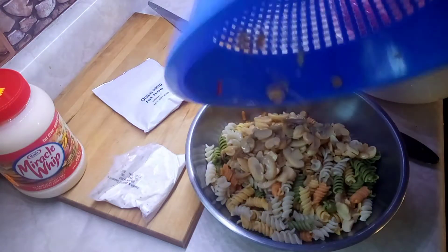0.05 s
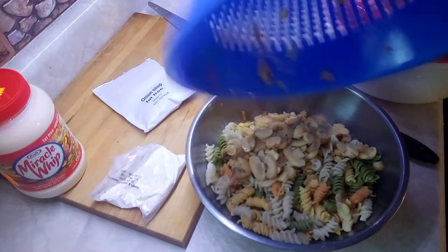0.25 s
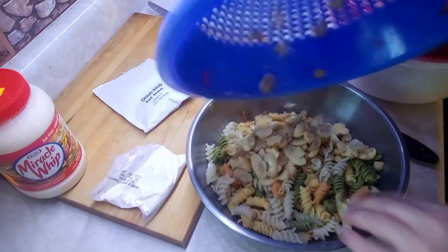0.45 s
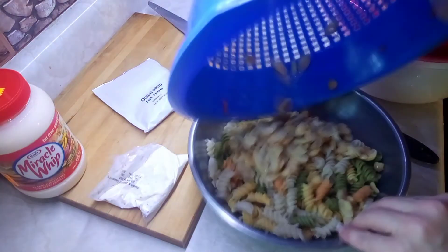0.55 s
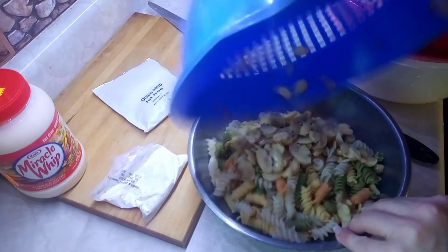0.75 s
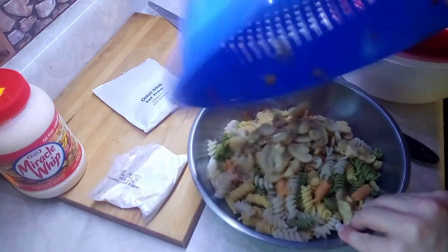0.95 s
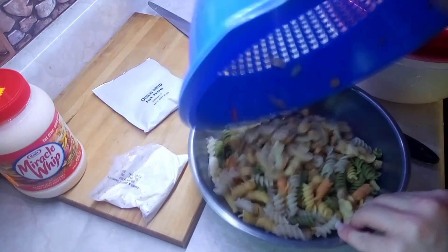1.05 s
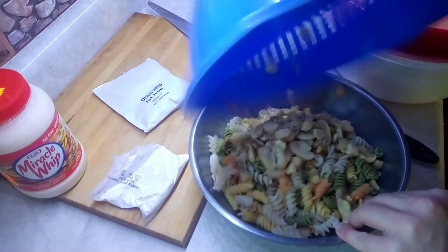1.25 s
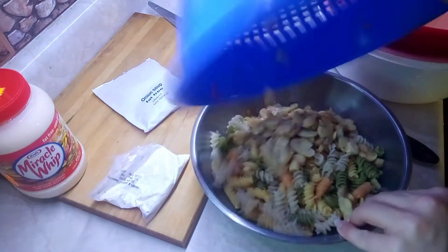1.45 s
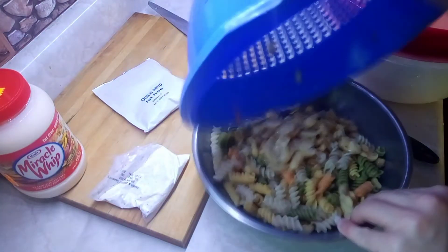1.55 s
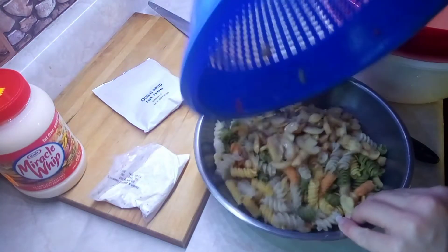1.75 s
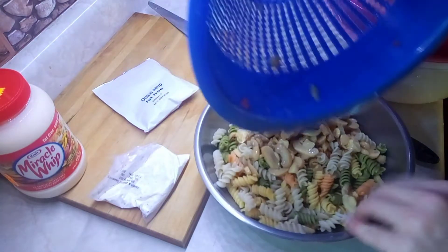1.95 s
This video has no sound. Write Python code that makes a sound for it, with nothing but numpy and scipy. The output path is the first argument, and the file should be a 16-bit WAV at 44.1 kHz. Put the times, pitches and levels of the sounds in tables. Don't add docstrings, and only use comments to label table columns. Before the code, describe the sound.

Plastic strainer knocking quickly against a metal mixing bowl, ringing at first, then damped and clattery.

```python
import sys
import numpy as np
from scipy import signal
from scipy.fft import rfft, irfft
from scipy.io import wavfile

SR = 44100
rng = np.random.default_rng(int(sys.argv[2]) if len(sys.argv) > 2 else 0)


def wav_out(sig):
    wavfile.write(sys.argv[1], SR, np.round(np.clip(np.atleast_2d(sig).T, -1, 1) * 32767).astype(np.int16))


def to_linear_factor(level_db):
    exponent = np.asarray(level_db, float) / 20
    return 10 ** exponent


N = 88288
LEAD = SR // 2

# start in seconds, peak in dB, then crack, boom and steel ping in dB.
KNOCKS = [
    (0.2724, -21.5, 0, 0.5, 4.5),
    (0.4454, -17, 0.5, -1, 6),
    (.625, -13.5, 1, -1.5, 3.5),
    (0.8005, -13.5, .4, -1.5, 2.8),
    (0.9652, -13.5, 1, -2.5, -4),
    (1.1278, -13.5, 1.5, -2.2, -1),
    (1.2801, -16.5, 7, 5.5, -7),
    (1.4613, -12, 3.5, -0.5, -12),
    (1.6213, -11.5, 0.5, -1.5, -6),
    (1.7866, -14, 3.5, 0.5, -6.5),
]
# start in seconds, peak in dB.
TOUCHES = [
    (1.293, -21),
    (1.2995, -21),
    (1.328, -29),
    (1.52, -36),
    (1.63, -21),
    (1.794, -23),
    (1.817, -38),
]
# frequency in Hz, level in dB, 60 dB decay in seconds.
SHELL_MODES = [(1088, -6.5, 0.037), (1377, -9, 0.098), (1676, -5, .04), (1819, -16.5, 0.15),
               (1973, -5.5, 0.029), (2580, -9.5, 0.054), (3840, -23.5, 0.07), (4097, -6.5, 0.025),
               (4230, 5, 0.016), (5080, -14.5, 0.013), (6900, -6, 0.076)]
# frequency in Hz, level in dB, 60 dB decay in seconds.
STEEL_MODES = [(2261, -9, 0.062), (3128, -4.5, 0.065), (3925, -2, 0.029), (4836, -3, 0.036),
               (5615, -16, 0.08)]
# frequency in Hz, level in dB, 60 dB decay in seconds.
BOOM_MODES = [(99.3, -8, 0.26), (159, -5, 0.19), (223, -9, 0.27), (339.9, -1, 0.26), (508, -9, 0.13),
              (762.4, 1, 0.083), (899, -4, 0.12)]
# frequency in Hz, level in dB per Hz.
CRACK_SPECTRUM = [(300, -34.5), (600, 2), (2500, -4), (4000, -1.5), (6000, -10.5), (7000, -12.5),
                  (9000, -26)]
# start in seconds, peak in dB, tick in dB.
THUDS = [
    (0.3099, -24.5, -49.5),
    (0.4961, -18.5, -43.5),
    (0.7114, -29.5, -58.5),
    (0.8466, -15, -40),
    (1.0126, -17, -48),
    (1.1746, -17, -42.5),
    (1.3359, -15.5, -34),
    (1.526, -27.5, -50),
    (1.678, -16, -38.5),
    (1.8552, -13.5, -38.5),
]
# delay in seconds, level in dB.
ECHOES = [
    (.0048, -8),
    (.0075, -6),
    (.0098, -2.5),
]
# frequency in Hz, level in dB, 60 dB decay in seconds.
BOARD_MODES = [(148.5, -7, 0.4), (208, -11.5, 0.13), (284, -6.5, 0.26), (325.2, 0, 0.26),
               (346.6, -7.5, 0.23), (425.7, -5.5, 0.23), (548.6, -3.5, 0.27), (620, -24, 0.048),
               (708, -2, .1), (914, 2, 0.082), (1120, -13.5, 0.16)]
# frequency in Hz, then level in dB in each of the four ringing spells.
BOWL_MODES = [(727, -89, -90, -90, -92), (1297, -81, -90, -90, -92), (1748, -95, -74, -84, -92),
              (2108, -86, -72, -71, -86), (2336, -73, -69, -73, -71), (2525, -80, -79, -77, -86),
              (2606, -73, -67, -63, -82), (3020, -92, -79, -70, -86), (3558, -84, -81, -72, -84),
              (4167, -84, -85, -83, -88)]
# start in seconds, stop in seconds.
RINGING_SPELLS = [
    (-.2, .275),
    (.3, 0.44),
    (.47, .627),
    (.65, 0.79),
]
# frequency in Hz, level in dB per Hz.
SHUDDER_SPECTRUM = [(35, -59), (60, -24), (125, -2), (329, -5.5), (740, -20), (1280, -25), (2500, -30.5),
                    (3250, -47), (5500, -120)]
# frequency in Hz, 60 dB decay in seconds (negative: the band grows instead).
ROOM_T60 = [(100, 0.1), (400, 0.22), (1200, 0.31), (3000, 0.15), (6000, 0.32), (12000, -1.22)]
# frequency in Hz, level in dB.
ROOM_TONE = [(100, -8), (400, -10), (1200, -15.5), (3000, -4), (6000, -15.5), (12000, -23.5)]
# frequency in Hz, level in dB per Hz.
AIR_SPECTRUM = [(18, -37), (30, -11.5), (150, 3.5), (791, -20), (1290, -16), (1490, -11.5), (2320, -8),
                (4260, 2), (8000, -21), (10400, -57), (17600, -120)]
# frequency in Hz, level in dB per Hz.
FIZZ_SPECTRUM = [(4410, -19), (7500, 0.5), (8190, -13.5), (8830, -11.5), (13600, -20.5), (15000, -6.5),
                 (15900, -7.5)]
# time in seconds, level in dB added to the fizz.
GRIT = [(0, 15), (.3, -11), (.46, 0), (.63, -2.5), (.8, 1.5), (1.13, 3), (1.301, 8.5), (1.471, 1),
        (1.63, 8.5), (1.701, 12), (1.79, 0.5), (1.85, 11)]

CHATTER_S, SPREAD_DB = 0.00398, 1.5
CRACK_DB, CRACK_T60_S, TICK_T60_S = -9.5, 0.029, 0.018
BOOM_RISE_S = 0.015
MODES_KEEP = 0.67
EARLIER_S, EARLIER_DB = -.065, -13.5
SLAP_HZ, SLAP_T60_S, SLAP_DB = 658, 0.0041, 11.5
BOWL_T60_S, BOWL_SWELL_S, STILL_S = 2.8, 0.005, 0.0033
SHUDDER_DB, SHUDDER_T60_S = -15.5, 0.26
ROOM_GAP_S = 0.0033
AIR_DB = -61.5
OVERLOAD = 0.5
MIC_LOW_HZ, MIC_HIGH_HZ = 70, 9400
FIZZ_DB, FIZZ_POWER, FIZZ_SIDE_DB, FIZZ_FLOOR_DB = -19, 1.136, -10.5, -92.5


def at_hz(points, hz):
    table = np.array(points)
    return np.interp(np.log(hz + 1), np.log(table[:, 0]), table[:, 1])


def coloured(x, spectrum):
    hz = np.arange(len(x) // 2 + 1) * SR / len(x)
    y = irfft(rfft(x) * to_linear_factor(at_hz(spectrum, hz)), len(x))
    return y / y.std()


def clicks(s, gain):
    out = np.full(N + LEAD, 1e-18)
    np.add.at(out, (np.asarray(s) * SR).astype(int) + LEAD, gain)
    return out


def dying(x, t60):
    return signal.lfilter([1], [1, -to_linear_factor(-60 / (t60 * SR))], x)


def smooth(x, seconds):
    r = np.exp(-1 / (seconds * SR))
    return signal.lfilter([1 - r], [1, -r], x)


def ring(x, hz, t60):
    r, w = to_linear_factor(-60 / (t60 * SR)), 2 * np.pi * hz / SR
    return signal.lfilter([0, np.sin(w)], [1, -2 * r * np.cos(w), r * r], x)


def strike(modes, s, db, spread_db, keep=1):
    luck = spread_db * rng.standard_normal((len(s), len(modes))).clip(-1, 1) / 2
    total = 0
    for k, (hz, mode_db, t60) in enumerate(modes):
        blows = clicks(s, to_linear_factor(db + mode_db + luck[:, k]))
        total = total + (-1) ** k * ring(blows, hz, keep * t60)
    return total


def knocks():
    s, db, crack_db, boom_db, steel_db = np.transpose(KNOCKS)
    touch_s, touch_db = np.transpose(TOUCHES)
    contact_s = np.concatenate([s, s + 0.326 * CHATTER_S, s + CHATTER_S, touch_s])
    contact_db = np.concatenate([db - 4, db - 3.5, db - 7.5, touch_db])
    contact_crack_db = np.r_[np.tile(crack_db, 3), 0 * touch_s]

    shell = strike(SHELL_MODES, contact_s, contact_db - 8, SPREAD_DB)
    steel = strike(STEEL_MODES, s + 0.2944 * CHATTER_S, db + steel_db - 9, 3.45)
    swell = (1 - dying(clicks(s, 1), 7 * BOOM_RISE_S)).clip(0, 1)
    boom = strike(BOOM_MODES, s, db + boom_db - 7, 4.4, MODES_KEEP) * swell
    crack = dying(clicks(contact_s, to_linear_factor(contact_db + CRACK_DB + contact_crack_db)), CRACK_T60_S)
    push = clicks(s, to_linear_factor(db + boom_db - 1.5))
    return shell + steel + boom, crack, push


def thuds():
    s, db, tick_db = np.transpose(np.vstack([THUDS, (EARLIER_S, EARLIER_DB, -30)]))
    jitter = 0.00074 * rng.standard_normal((len(s), len(ECHOES)))
    slaps = clicks(s, to_linear_factor(db))
    for k, (lag, loss_db) in enumerate(ECHOES):
        slaps = slaps + clicks(s + lag + jitter[:, k], to_linear_factor(db + loss_db))
    slap = ring(ring(slaps, SLAP_HZ, SLAP_T60_S), SLAP_HZ, SLAP_T60_S)
    slap = -to_linear_factor(SLAP_DB) * slap * 4 * SLAP_HZ / SR
    board = strike(BOARD_MODES, s + 0.00209, db - 13.5, 5.0, MODES_KEEP)
    tick = dying(clicks(s - .0008, to_linear_factor(tick_db + 14)), TICK_T60_S)
    return slap + board, tick, clicks(s, to_linear_factor(db))


def bowl():
    t = (np.arange(N + LEAD) - LEAD) / SR
    out = 0
    for k, (start, stop) in enumerate(RINGING_SPELLS):
        free = smooth(1. * (t > start), BOWL_SWELL_S)
        free = smooth(free * (t < stop), STILL_S)
        modes = sum(ring(clicks([start], to_linear_factor(row[k + 1] + 17)), row[0], BOWL_T60_S) for row in BOWL_MODES)
        out = out + free * modes
    return out


def shudder(blows):
    envelope = smooth(dying(blows, SHUDDER_T60_S), 0.0049)
    return to_linear_factor(SHUDDER_DB) * envelope * coloured(rng.standard_normal(N + LEAD), SHUDDER_SPECTRUM)


def kitchen(x):
    t = np.arange(SR // 2) / SR
    tail = 0
    for low in 60 * 2. ** np.arange(8):
        octave = signal.butter(2, [low, 2 * low], "band", fs=SR, output="sos")
        band = signal.sosfilt(octave, rng.standard_normal(len(t)))
        band = band * to_linear_factor(-60 * t / at_hz(ROOM_T60, 1.345 * low)) * (t > ROOM_GAP_S)
        level = to_linear_factor(at_hz(ROOM_TONE, 1.266 * low)) * np.sqrt(low / SR * 2 / np.sum(band ** 2))
        tail = tail + band * level
    return signal.fftconvolve(x, tail)[:len(x)]


def air():
    return to_linear_factor(AIR_DB) * coloured(rng.standard_normal(N), AIR_SPECTRUM)


def scene():
    rim, crack, push = knocks()
    board, tick, drop = thuds()
    contact_noise = coloured(rng.standard_normal(N + LEAD), CRACK_SPECTRUM) * (crack + tick)
    direct = rim + board + contact_noise
    mid = direct + shudder(push + drop) + kitchen(direct) + bowl()
    mid = mid[LEAD:] + air()
    return np.array([mid, mid])


def fizz(heard):
    treble = signal.sosfilt(signal.butter(2, 4500, "high", fs=SR, output="sos"), heard)
    treble = np.sqrt(smooth(treble ** 2, 0.0025))
    grit_db = np.interp(np.arange(N) / SR, *np.transpose(GRIT))
    level = to_linear_factor(FIZZ_DB + grit_db) * treble ** FIZZ_POWER + to_linear_factor(FIZZ_FLOOR_DB)
    noises = [coloured(rng.standard_normal(N), FIZZ_SPECTRUM) * level for _ in range(2)]
    mid, side = signal.sosfilt(signal.cheby2(10, 50, 16400, fs=SR, output="sos"), noises)
    return mid + to_linear_factor(FIZZ_SIDE_DB) * side * [[1], [-1]]


def low_pass(x):
    return signal.sosfilt(signal.butter(12, 16940, fs=SR, output="sos"), x)


def record(dry):
    x = OVERLOAD * np.tanh(dry / OVERLOAD)
    x = signal.sosfilt(signal.butter(3, MIC_LOW_HZ, "high", fs=SR, output="sos"), x)
    x = signal.sosfilt(signal.cheby2(6, 50, MIC_HIGH_HZ, fs=SR, output="sos"), x)
    return low_pass(x + fizz(x[0]))


dry = scene()
out = record(dry)
wav_out(out)
```